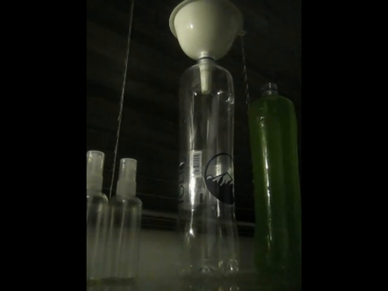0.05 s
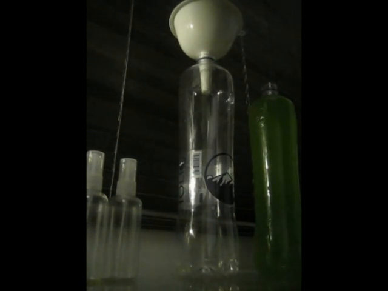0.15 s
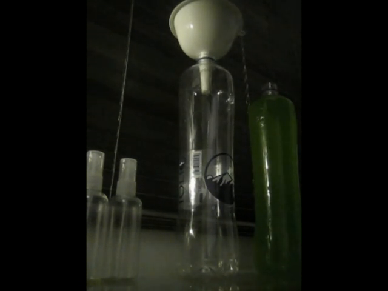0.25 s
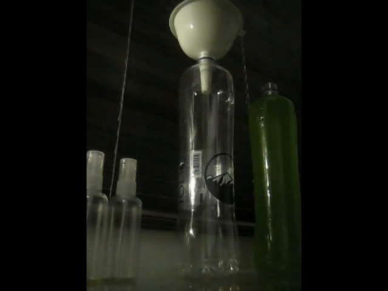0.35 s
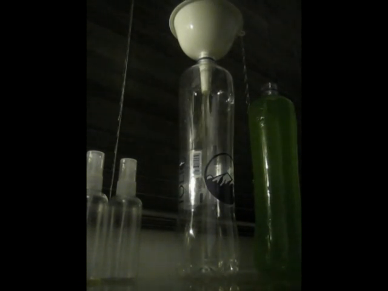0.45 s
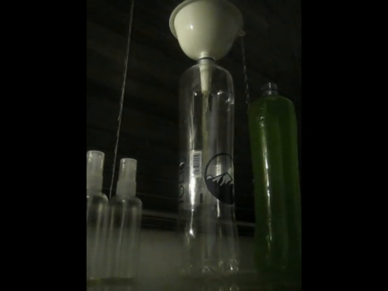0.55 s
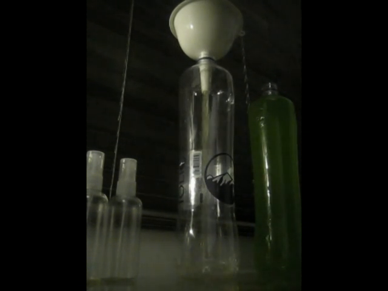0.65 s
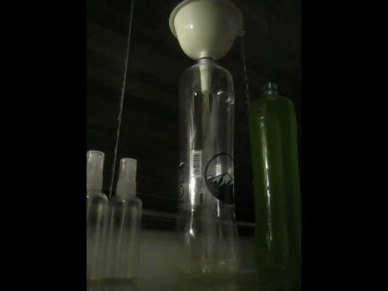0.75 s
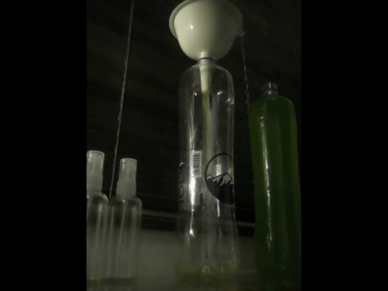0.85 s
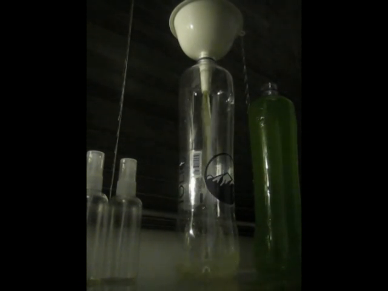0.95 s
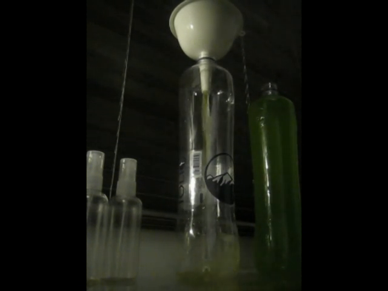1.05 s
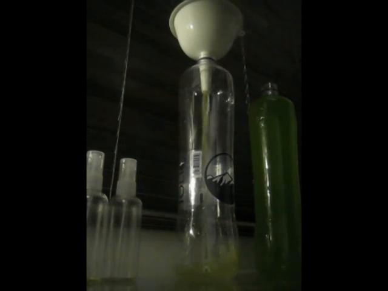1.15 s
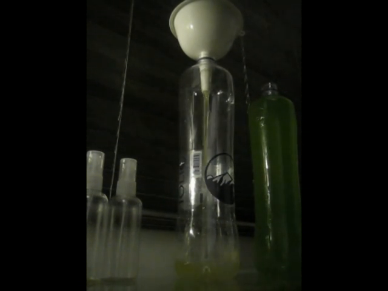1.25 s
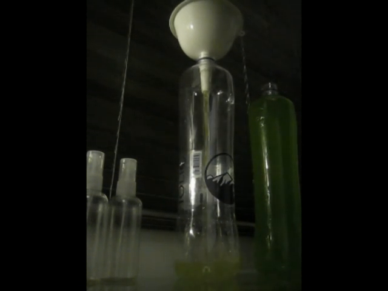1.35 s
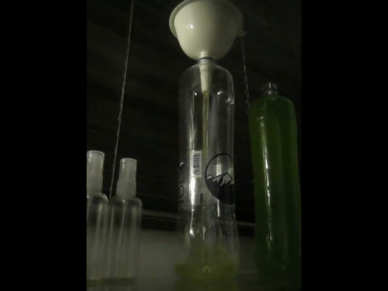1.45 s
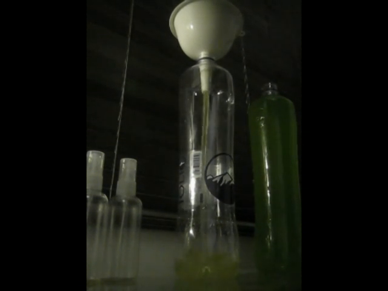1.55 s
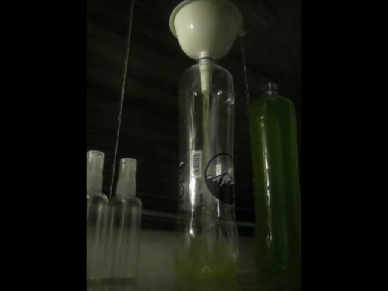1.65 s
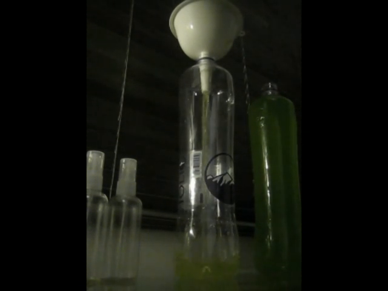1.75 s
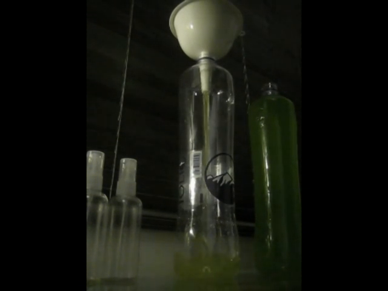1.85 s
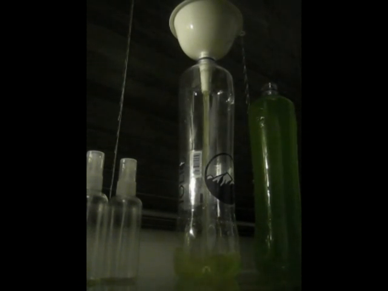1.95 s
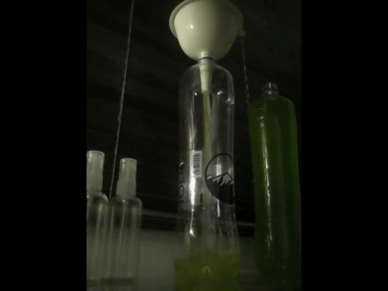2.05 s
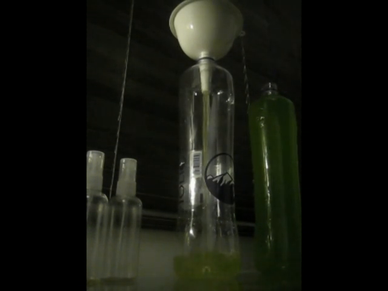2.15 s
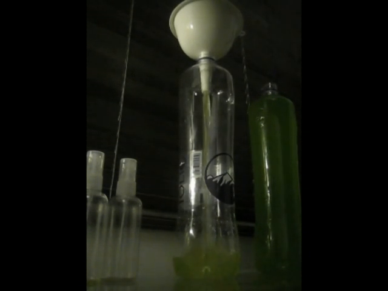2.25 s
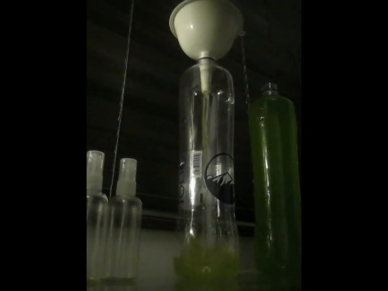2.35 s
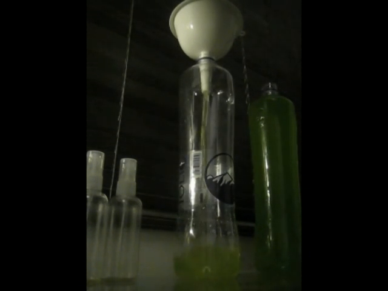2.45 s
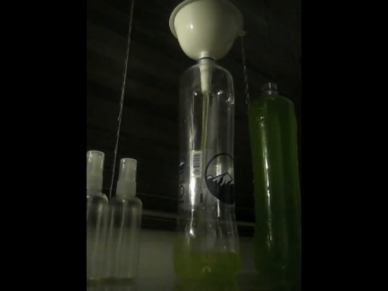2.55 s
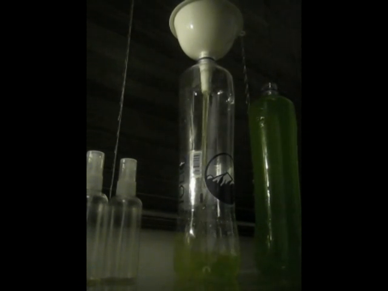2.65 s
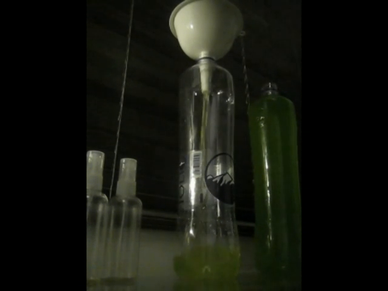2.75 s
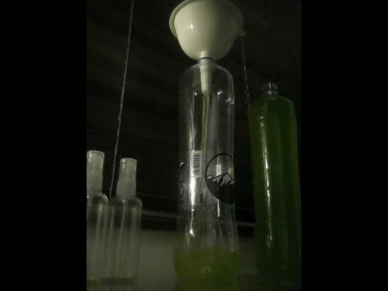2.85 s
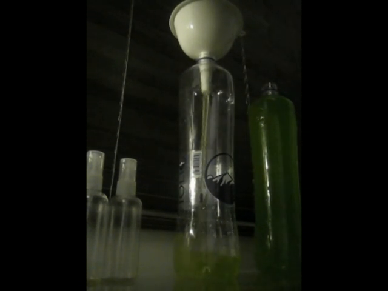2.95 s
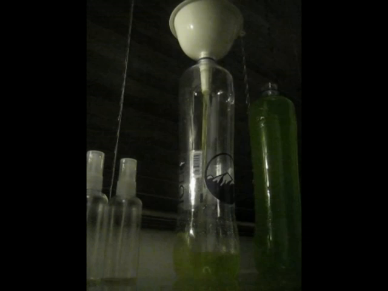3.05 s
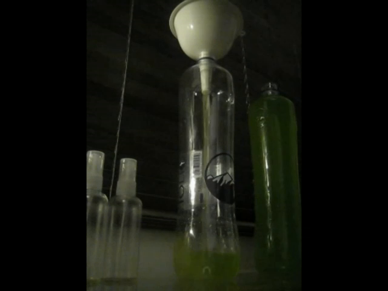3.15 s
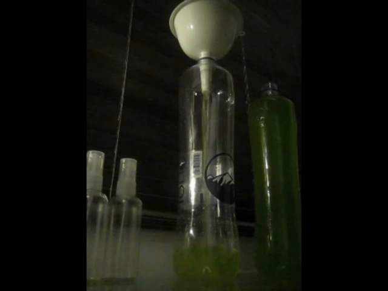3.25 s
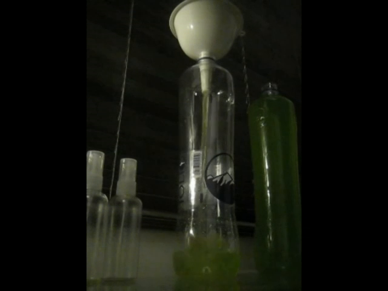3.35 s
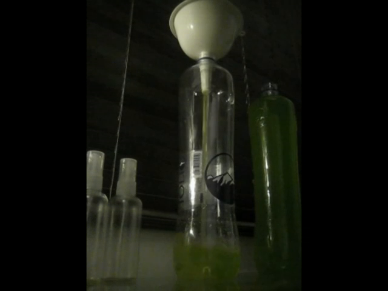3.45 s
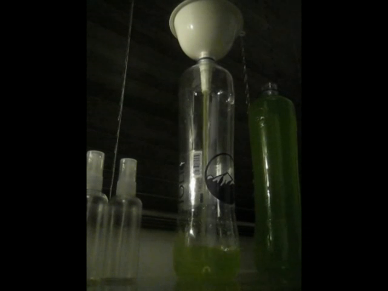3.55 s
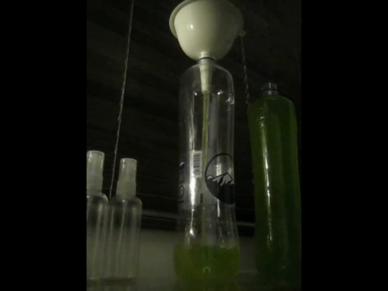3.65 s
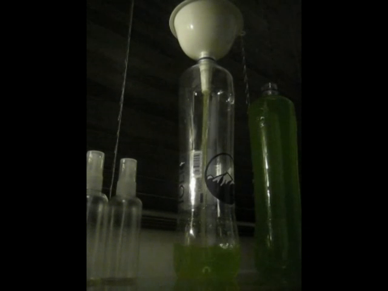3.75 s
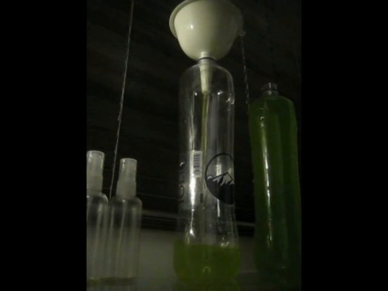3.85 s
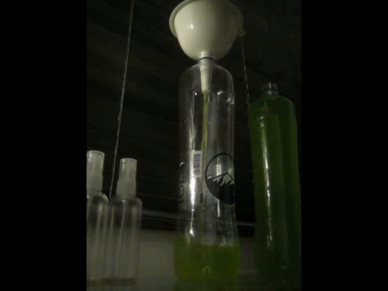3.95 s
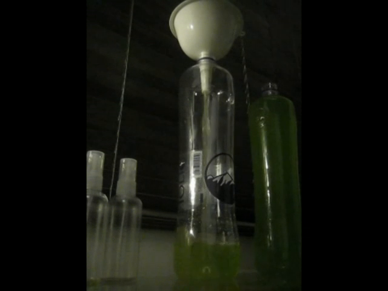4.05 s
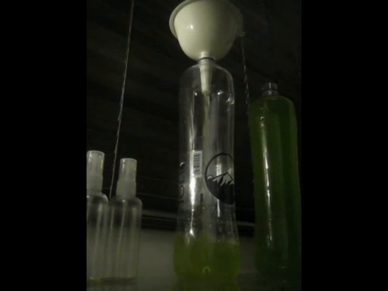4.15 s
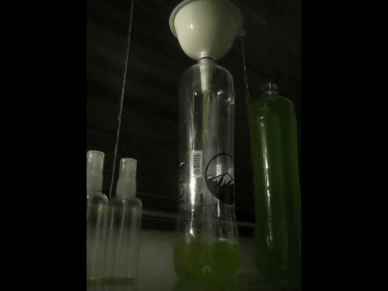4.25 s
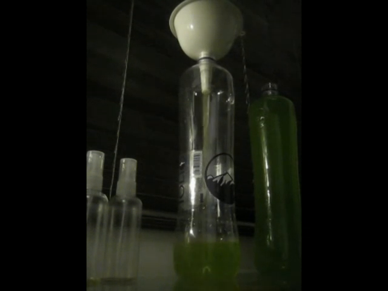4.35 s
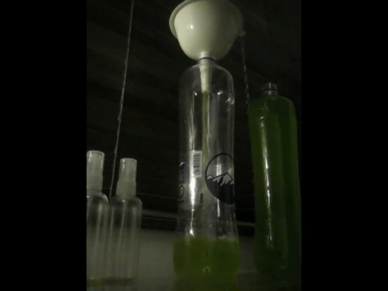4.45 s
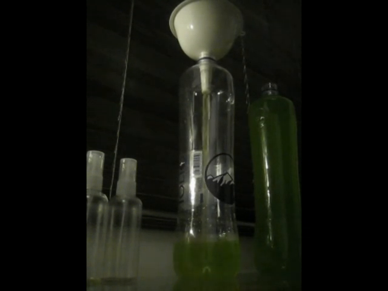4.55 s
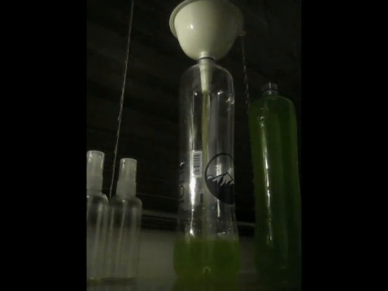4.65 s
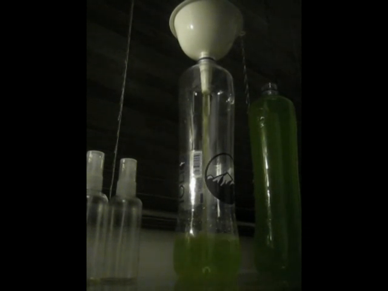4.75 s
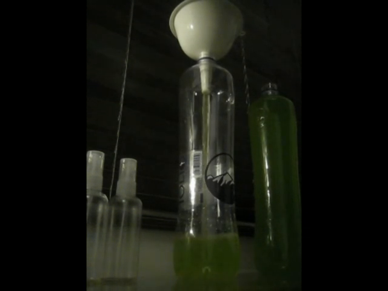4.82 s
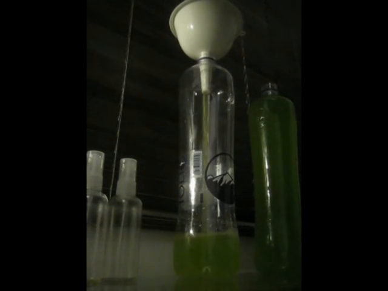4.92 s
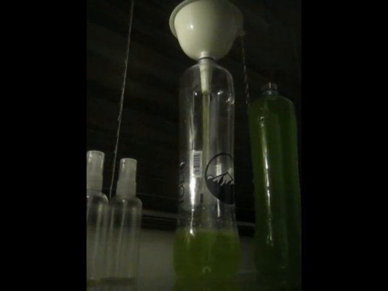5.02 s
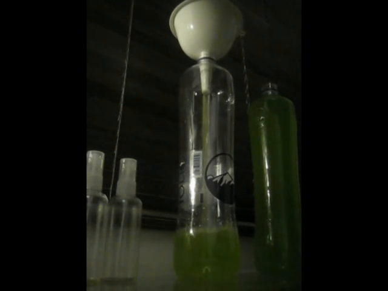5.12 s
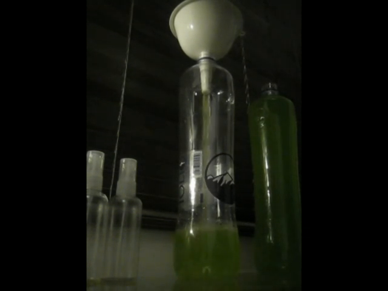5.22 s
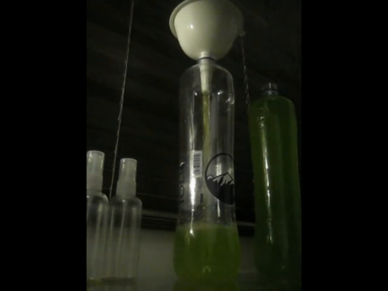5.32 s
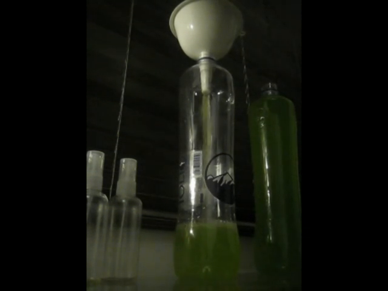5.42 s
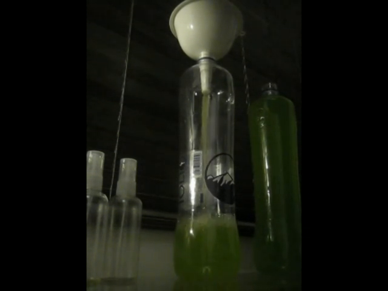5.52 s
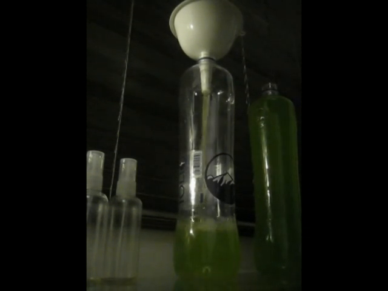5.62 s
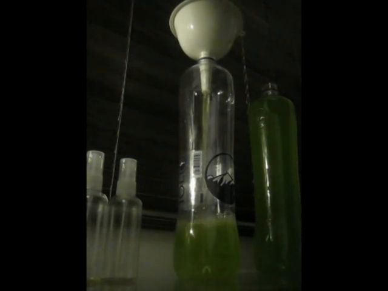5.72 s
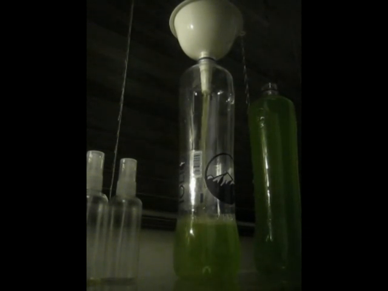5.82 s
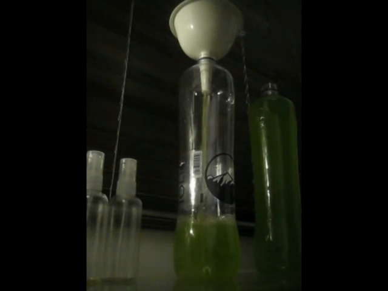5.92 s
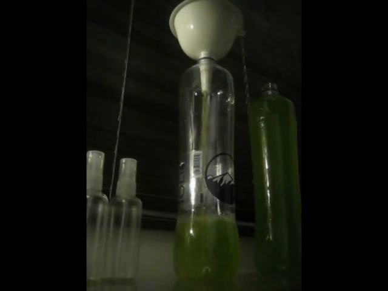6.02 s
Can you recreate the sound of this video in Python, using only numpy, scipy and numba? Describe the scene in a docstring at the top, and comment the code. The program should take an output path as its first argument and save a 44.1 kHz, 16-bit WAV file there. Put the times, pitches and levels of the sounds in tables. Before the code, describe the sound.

Close up in a small room, quiet hiss and a faint high whine come first. A couple of tiny drips precede a sudden splash as liquid from a funnel hits the bottom of a tall empty plastic bottle. The uneven stream spatters brightly and hollowly, then turns into dense bubbling and plopping with deeper gurgles as the level rises, still pouring at the end.

```python
"""On a table in a room, liquid falls from a funnel into a tall plastic bottle, heard from close by.
A broken stream splashes on the bottom, then into the pool: bubbles of all sizes ring a few cycles in
surges, and landing slugs of liquid add slaps and clearer bubbles. Resonances ring along as the bottle,
the table adds a short inverted echo and the walls a soft tail; behind it lie room noise and a thin whine."""
import sys
import numpy as np
from scipy import signal
from scipy.fft import rfft, irfft
from scipy.io import wavfile
from numba import njit

SR = 44100
rng = np.random.default_rng(int(sys.argv[2]) if len(sys.argv) > 2 else 0)


def waveform_to_disk(signal):
    """Save audio, clipped to [-1, 1], as 16-bit WAV at the path in sys.argv[1]."""
    frames = np.transpose(np.atleast_2d(signal))
    scaled = np.clip(frames, -1, 1) * 32767
    samples = np.round(scaled).astype(np.int16)
    wavfile.write(sys.argv[1], SR, samples)


N = 268128  # length in samples

# Room noise, relative level by pitch: f/Hz, level per Hz/dB
ROOM_SPECTRUM = [(25, -13), (60, -16.5), (150, -9.5), (250, -11.5), (370, -8.5), (900, -3), (1300, -6.5),
                 (2100, -16), (3400, -11), (4500, -17.5), (5600, -5.5), (6400, -20.5), (7600, -12.5),
                 (8600, -21), (9700, -16), (11200, -15), (12400, -21), (13200, -31)]
ROOM_DB = -49.5  # rms
# Faint steady tones: f/Hz, rms level/dB
FAINT_TONES = [(371.4, -65), (7881, -73), (11186, -76)]
# The whine wavers in loudness (share) and phase (radians)
WHINE_HZ, WHINE_DB, WARBLE_HZ, WARBLE_RAD, WARBLE_DEPTH = 7560, -53.5, 30, .68, .22

# Loudest slugs that land, levels before the trims in slugs():
# t/s, slap level/dB, big bubble f/Hz, big bubble level/dB, small bubble f/Hz, small bubble level/dB
LOUD_SLUGS = [(0.686, -30, 676, -52, 7570, -44), (0.83, -27, 748, -46, 6720, -17.5),
              (0.972, -23, 689, -32, 3180, -37), (0.978, -17, 690, -24.5, 3080, -29),
              (0.99, 4, 1080, -13, 2590, -9), (1.044, -19, 580, -21, 2690, -31),
              (1.055, -9, 610, -20, 2840, -31), (1.09, -11, 804, -22, 2640, -19.5),
              (1.118, 1.5, 790, -26, 5000, -5.5), (1.14, -9, 850, -24, 7000, -10),
              (1.172, -1.5, 590, -15, 2920, -19), (1.203, -12, 589, -17, 3000, -7),
              (1.233, -1.5, 1280, -22, 3700, -5), (1.252, -9, 770, -25, 2550, -15),
              (1.268, -5.5, 800, -20, 2385, -9), (1.286, -9, 890, -14.5, 3150, -24),
              (1.327, -23, 730, -19.5, 2940, -23), (1.344, -8, 1000, -13, 2660, -16),
              (1.361, -2, 1880, -20, 3010, -12), (1.397, -6, 1550, -24, 2460, -14),
              (1.419, 0, 1040, -23, 7600, -12.5), (1.449, -4, 1020, -19, 2980, -10),
              (1.512, -18, 1010, -25, 4830, -27), (1.542, -1.5, 1780, -15, 4840, -15),
              (1.571, -4, 1030, -7.5, 2800, -18), (1.635, -3, 877, -13, 5100, -31),
              (1.666, -7, 1020, -20, 4940, -29), (1.701, -5, 1540, -10, 3160, -13.5),
              (1.772, -5, 845, -18, 4860, -5), (1.788, -25, 1060, -10.5, 2740, -19),
              (1.828, -2, 1090, -26, 3090, -14.5), (1.89, -0.5, 1380, -17, 3300, -11),
              (1.898, -8, 840, -19, 5500, -10), (1.924, -9, 780, -25, 3000, -22),
              (1.995, -8, 1680, -19, 3280, -22.5), (2.011, -5, 875, -8.5, 2680, -17),
              (2.042, -2, 850, -26, 3930, -14), (2.202, -7, 991, -12, 3310, -17),
              (2.255, -5, 1050, -17.5, 3140, -23), (2.305, -8, 890, -16, 3060, -21),
              (2.331, -6, 800, -29, 3220, -18), (2.392, -6.5, 1040, -17, 3390, -18),
              (2.462, -5, 1150, -15, 3160, -17), (2.484, -4, 1370, -11, 3210, -8),
              (2.521, 1, 1060, -24, 3230, -17), (2.549, -6, 824, -17, 3780, -22),
              (2.572, -13, 1040, -15, 3380, -22), (2.626, -4, 1580, -17, 4950, -14.5),
              (2.652, -8, 1640, -11, 3130, -9), (2.683, -3, 1210, -9, 3220, -14),
              (2.713, -7, 756, -13.5, 3160, -19), (2.756, -7.5, 860, -16, 3290, -30),
              (2.802, -19, 1530, -12, 3060, -29), (2.816, -17, 1480, -3.5, 2670, -30),
              (2.926, -8, 755, -28, 3030, -18), (2.97, -3, 1200, -16, 5450, -23),
              (3.03, -11, 988, -21, 2840, -24), (3.04, -20, 1550, -13, 3030, -29),
              (3.107, -27, 1570, -14, 2930, -27), (3.127, -9, 1150, -21, 3960, -9.5),
              (3.146, -17, 1160, -23, 4030, -15), (3.176, -12, 1060, -16, 5010, -21),
              (3.186, -12, 790, -13, 4950, -24), (3.26, -7, 1570, -15, 4970, -30),
              (3.274, 1, 1100, -22, 4960, -25), (3.293, -5.5, 1070, -12.5, 3300, -27),
              (3.356, -10, 1220, -12, 3370, -28), (3.381, -19, 1530, -12, 3340, -31),
              (3.454, -13, 1110, -16, 7420, -15), (3.498, -6, 1590, -8, 3030, -18),
              (3.537, -7, 1030, -19, 2820, -19), (3.574, -23, 1020, -15, 3600, -22),
              (3.625, -3, 1520, -17.5, 3760, -20), (3.639, -10, 1140, -12, 2500, -15),
              (3.66, -22, 780, -17.5, 3020, -23), (3.759, -26, 916, -12, 3380, -33),
              (3.8, -18, 1000, -13.5, 5000, -29), (3.917, -18, 1110, -13.5, 2900, -30),
              (3.975, -18, 985, -18, 2930, -29), (4.0, -23, 1550, -23, 4650, -17),
              (4.166, -7, 980, -9, 6760, -33), (4.199, -7, 1160, -11, 3100, -18),
              (4.283, -5, 1010, -32, 3100, -17), (4.308, -18, 727, -21, 4220, -15.5),
              (4.337, -20, 1010, -21, 3620, -30), (4.369, -14, 1010, -20, 4770, -21),
              (4.389, -5, 1040, -11.5, 4800, -25), (4.431, -5, 1030, -13.5, 7000, -25.5),
              (4.474, -9, 1120, -10, 2800, -31), (4.55, -22, 1010, -17, 3130, -14),
              (4.581, -4, 1160, -12, 5130, -32), (4.614, -10, 1010, -21, 5350, -13.5),
              (4.644, -17, 1180, -10, 2440, -23), (4.728, -17, 786, -14.5, 3390, -28),
              (4.766, 1.5, 900, -15, 6740, -21), (4.786, -3, 886, -8.5, 3250, -22),
              (4.827, -8, 1030, -15, 3490, -23), (4.864, -16, 1000, -24, 5500, -21),
              (4.964, -24, 985, -7, 3000, -27), (5.037, -29, 970, -22, 2970, -33),
              (5.081, -24, 970, -17, 3020, -27), (5.103, -5.5, 1080, -8.5, 3100, -25),
              (5.14, -10, 790, -14.5, 4460, -29), (5.168, -15, 1110, -16, 4700, -28),
              (5.22, -4, 1000, -16, 3630, -26), (5.286, -16, 715, -23, 7300, -29),
              (5.37, -22, 727, -19, 3000, -39), (5.41, -8, 1040, -15.5, 3000, -42),
              (5.471, -3, 990, -15, 4400, -12.5), (5.535, -13, 1220, -26, 2450, -19),
              (5.594, -17, 1020, -38, 3000, -23), (5.625, -5, 1320, -18, 3000, -18),
              (5.695, -10, 1160, -15, 5200, -24), (5.738, -7, 1010, -30, 3370, -19),
              (5.814, -8, 1220, -19, 3680, -20), (5.866, -15, 980, -14, 4340, -23),
              (5.895, -16, 1220, -22, 5400, -32), (6.028, -30, 1250, -14, 7560, -40)]
# Slap noise, relative level by pitch: f/Hz, level per Hz/dB
SLAP_SPECTRUM = [(300, -12.5), (1000, 2.5), (2500, 0), (5000, 0), (8000, -9.5), (13500, -25)]
FIZZ_HZ, FIZZ_SCATTER_DB = 6800, 5.5  # the finest droplets of a slap differ from slug to slug

# Resonances of the bottle: f/Hz, width/Hz, added level when empty/dB, added level at the last fill/dB
BOTTLE_RESONANCES = [(85, 13, -3, -3), (133, 30.5, 3.5, 15), (270, 31, -7, 3.5), (407, 27, 12, -19),
                     (510, 49, 0, -10), (786.5, 95, -3, -1), (1030, 86, -3, -13), (1192, 45, -41, 4),
                     (1610, 224, 4, -1.5), (4930, 460, -14, -4), (7230, 1560, -11.5, 9)]

# Strength of the stream: t/s, splash level/dB
STREAM_LEVEL = [(1.0, -29.5), (1.2, -25.5), (1.37, -25), (1.6, -24.5), (1.95, -26.5), (2.3, -24.5),
                (2.55, -20.5), (2.8, -24), (3.0, -24), (3.45, -24), (3.75, -25.5), (4.05, -24.5),
                (4.3, -28), (4.55, -24.5), (4.9, -26), (5.1, -23), (5.45, -25), (5.75, -26), (6.08, -27.5)]
# The stream breaks off for a moment: t/s, length/s, level change/dB
STREAM_BREAKS = [(1.132, .04, -14), (1.257, 0.047, -8), (1.323, 0.035, -18), (1.756, 0.02, -10),
                 (1.874, 0.014, -9), (2.373, 0.023, -9), (2.894, 0.045, -3.5), (3.598, 0.017, -8),
                 (4.364, 0.024, -10.5), (5.188, 0.015, -4.5), (5.479, 0.024, -8), (5.853, 0.05, -6.5),
                 (5.914, 0.015, -5.5)]
# Bubble strength by pitch, relative: f/Hz, level per Hz/dB
BUBBLE_SPECTRUM = [(60, -15), (130, -39.5), (300, -2), (600, 0), (1000, 9.5), (1600, -0.5), (2400, -6.5),
                   (3500, -3), (5000, -10.5), (7000, -17.5), (10000, -20), (14000, -35)]
# Air is dragged under and large bubbles swell: t/s, level added to the large bubbles/dB
AIR_GLUGS = [(1.05, -3), (1.19, 3.5), (1.35, 10), (1.44, 7.5), (2.03, -5), (2.62, 4.5), (3.18, 1), (3.3, 9),
             (3.55, 3), (3.75, 1), (4.2, 10.5), (4.41, 9.5), (4.8, 14.5), (5.43, 9.5), (5.7, 3), (6.04, 3)]
GLUG_S = 0.046  # width of each swelling
POUR_S = 0.99  # the stream reaches the bottom
# How the deepening pool shifts the sizes, dB above the splash: (empty, at the last fill)
SPRAY_DB, HOLLOW_DB, GURGLE_DB = (5, -3.5), (-1, 0.5), (4, 19.5)
BARE_DB, COVERED_S = 7.5, 0.53  # the bare bottom drums louder until the pool covers it

# Lesser slugs: dB above the splash for slap, big and small bubble; then the scatter
LESSER_DB, LESSER_SCATTER_DB = (9.5, 3.5, -2.5), 3
# Typical pitch, and its random spread as a natural logarithm
BIG_HZ, BIG_SPREAD, SMALL_HZ, SMALL_SPREAD = 1000, 0.193, 2776, .3
LESSER_FROM_S = 1.35  # lesser slugs land only from here on

TOP_HZ, CEILING = 13750, .85  # treble limit, and the height at which peaks flatten


def undb(db):
    """Turn dB into a plain factor."""
    return 10 ** (np.asarray(db) / 20)


def level(x, db):
    """Scale a sound to an rms level in dB."""
    return x * undb(db) / np.sqrt(np.mean(x ** 2))


def column(table, k):
    """One column of a table."""
    return np.array(table, float)[:, k]


def lookup(table, hz):
    """Read dB from a (Hz, dB) table, with pitch on a log axis."""
    return np.interp(np.log(hz), np.log(column(table, 0)), column(table, 1))


def coloured(table):
    """Noise with the spectrum of a (Hz, dB) table, rms 1."""
    f = np.arange(N // 2 + 1) * SR / N + 1
    return level(irfft(rfft(rng.standard_normal(N)) * undb(lookup(table, f)), N), 0)


def highpass(x, order, hz):
    """Remove sound below a pitch."""
    return signal.sosfilt(signal.butter(order, hz, "high", fs=SR, output="sos"), x)


def fade(x, seconds):
    """Each sample leaves a tail that falls to 1 / e in the given time."""
    return signal.lfilter([1], [1, -np.exp(-1 / (seconds * SR))], x)


def bumps(t, at, width_s, db):
    """Sum of bell-shaped changes of level, in dB."""
    return sum(d * np.exp(-(2 * (t - a) / w) ** 2) for a, w, d in np.broadcast(at, width_s, db))


def filling(t, ends):
    """A value that drifts from its empty to its last state as the pool deepens."""
    return np.interp(t, [POUR_S, N / SR], ends)


def splash_db(t):
    """Level of the stream, with its short breaks."""
    steady_db = np.interp(t, column(STREAM_LEVEL, 0), column(STREAM_LEVEL, 1))
    return steady_db + bumps(t, *np.array(STREAM_BREAKS).T)


def background():
    """Steady room noise, faint tones and a high whine that warbles quickly in loudness and phase."""
    t = np.arange(N) / SR
    tones = sum(undb(db) * np.sin(2 * np.pi * (hz * t + rng.random())) for hz, db in FAINT_TONES)
    turn = 2 * np.pi * WARBLE_HZ * t
    whine = np.sin(2 * np.pi * WHINE_HZ * t + WARBLE_RAD * np.sin(turn))
    whine = whine * (1 + WARBLE_DEPTH * np.cos(turn))
    # a sine of height sqrt(2) has rms 1
    return undb(ROOM_DB) * coloured(ROOM_SPECTRUM) + np.sqrt(2) * (tones + undb(WHINE_DB) * whine)


@njit
def ring(n, start, hz, cycles, size, glide, swell):
    """Each bubble is a dying sine that rises in pitch: air trapped in liquid pulses like a spring.

    cycles = periods to fall to 1 / e, glide = share the pitch rises meanwhile, swell = periods to build up.
    """
    y = np.zeros(n)
    for k in range(len(start)):
        w = 2 * np.pi * hz[k] / SR
        fall = hz[k] / (cycles[k] * SR)
        z = size[k] + 0j
        step = np.exp(1j * w - fall)
        bend = np.exp(1j * w * glide[k] * fall)
        shut, opening = 1., np.exp(-hz[k] / (swell[k] * SR))
        for i in range(start[k], min(n, start[k] + int(5 / fall))):
            y[i] += z.imag * (1 - shut)
            shut *= opening
            z *= step
            step *= bend
    return y


def resonance(x, hz, width_hz):
    """Something that rings at one pitch: a band-pass with gain 1 at the centre."""
    return signal.lfilter(*signal.iirpeak(hz, hz / width_hz, SR), x)


def droplet_burst(blows):
    """A burst of droplets swells within about a millisecond, dies in a few, then patters on."""
    return np.maximum(fade(blows, 0.0031) + 0.15 * fade(blows, 0.019) - 2.0 * fade(blows, 0.00039), 0)


def slap(blows):
    """A slug throws up droplets, heard as noise bursts, and its front cracks in a single swing."""
    drops = coloured(SLAP_SPECTRUM)
    coarse = signal.sosfiltfilt(signal.butter(2, FIZZ_HZ, fs=SR, output="sos"), drops)
    fine_blows = blows * undb(FIZZ_SCATTER_DB * rng.standard_normal(N))
    spatter = droplet_burst(blows) * coarse + droplet_burst(fine_blows) * (drops - coarse)
    crack = resonance(blows, 5500, 8100) * undb(8.5)
    return spatter + crack


def slugs():
    """A landing slug slaps the surface and sets a big and a small bubble ringing, with close neighbours."""
    # three rows per slug: itself, then two neighbours a few milliseconds later
    rows = np.repeat(np.vstack([LOUD_SLUGS, lesser_slugs()]), 3, axis=0)
    s, peak_db, big_hz, big_db, small_hz, small_db = rows.T
    chance = rng.standard_normal((len(s), 3)).T
    later = np.arange(len(s)) % 3 > 0
    start = ((s + later * .0028 * np.abs(chance[0])) * SR).astype(np.int64)
    one = np.ones(len(s))
    pool = np.clip((s - 1.3) / 3.6, 0, 1)  # the deeper the pool, the softer the landing

    big_hz = big_hz * (1 + later * 0.14 * chance[1])
    big_size = undb(big_db - 2.0 - later * 5.8)
    big = ring(N, start, big_hz, 2.67 + 0.52 * pool, big_size, 0.044 * one, 0.11 + 0.32 * pool)

    small_hz = small_hz * (1 + later * 0.046 * chance[2])
    small_size = undb(small_db - 4.0 - later * 3.4)
    small = ring(N, start, small_hz, 6.9 + 2.8 * pool, small_size, 0.026 * one, .5 + 1.0 * pool)

    blows = np.zeros(N)
    np.add.at(blows, start[~later], undb(peak_db - 14.5 - 7.7 * pool)[~later])
    return highpass(big + small + slap(blows), 2, 320)


def bottle(pour):
    """The bottle rings along at its own pitches, whose strengths drift from empty to the last fill."""
    ringing = sum(undb(np.linspace(empty_db, full_db, N)) * resonance(pour, hz, width_hz)
                  for hz, width_hz, empty_db, full_db in BOTTLE_RESONANCES)
    # a small vessel radiates no deep bass
    return highpass(pour + ringing, 4, 72)


def table_echo(x, ms, share):
    """An inverted copy a fraction of a millisecond late: peaks at odd multiples of 1 / (2 delay)."""
    f = np.arange(N // 2 + 1) * SR / N
    return irfft(rfft(x) * (1 - share * np.exp(-2j * np.pi * f * ms / 1000)), N)


def walls(x, t60_s, wet_db, gap_s):
    """A diffuse tail after a small gap, falling 60 dB in t60_s.

    It is drawn anew for each stretch of sound, as the splash wanders and the liquid rises.
    """
    t = np.arange(int(.4 * SR)) / SR
    part = 8192  # samples per stretch
    wet = np.zeros(N + SR)
    for i in range(0, N, part):
        tail = rng.standard_normal(len(t)) * np.exp(-np.log(1000) * t / t60_s) * (t > gap_s)
        piece = signal.fftconvolve(x[i:i + part], tail / np.sqrt(np.sum(tail ** 2)))
        wet[i:i + len(piece)] += piece
    return x + undb(wet_db) * wet[:N]


def surges(rate, spread_db, decay_s):
    """The stream breaks into lumps, rate per second: fast rises and quick decays, rms 1."""
    lumps = (rng.random(N) < rate / SR) * undb(spread_db * rng.standard_normal(N))
    return level(fade(lumps, decay_s) - fade(lumps, 0.0011) + 0.62, 0)


def spray(lumps):
    """Droplets too fine to hear singly: high noise that follows the lumps of the stream."""
    t = np.arange(N) / SR
    mist = level(highpass(coloured(BUBBLE_SPECTRUM), 2, 1800), -13.5)
    return mist * lumps ** 1.5 * undb(splash_db(t) + filling(t, SPRAY_DB)) * (t > POUR_S)


def stream():
    """Dense random bubbles over a fine spray; the flow sets how strong those of each size are."""
    count = 40000
    at, pitch, long, bend, big = rng.random((count, 5)).T
    at = POUR_S + at * (N / SR - POUR_S)
    hz = 70 * (14000 / 70) ** pitch ** .7
    start = (at * SR).astype(np.int64)

    # how far each bubble belongs to the high, deep or low group, 0 to 1
    high = np.clip(np.log2(hz / 1700) / 0.52, 0, 1)
    deep = np.clip(np.log2(260 / hz) / 0.43, 0, 1)
    low = np.clip(np.log2(700 / hz) / 0.18, 0, 1) - deep

    glug_db = bumps(at, column(AIR_GLUGS, 0), GLUG_S, column(AIR_GLUGS, 1))
    hollow_db = filling(at, HOLLOW_DB) + BARE_DB * np.exp(-(at - POUR_S) / COVERED_S)
    db = splash_db(at) + high * filling(at, SPRAY_DB)
    db = db + low * (hollow_db + glug_db) + deep * (filling(at, GURGLE_DB) + glug_db)
    cycles = 3.2 + (9.0 + 10.0 * high - 6.6 * deep) * long ** 3

    lumps = surges(45, 0.42, 0.0029)
    # small bubbles feel each lump most
    lump = lumps[start] ** (1.48 + 0.26 * high - 1.7 * deep)
    # droplets of like size come in swarms of their own, one per half octave
    swarms = np.array([surges(55, 2.5, 0.0099) for _ in range(6)])
    band = np.clip(2 * np.log2(hz / 1400), 0, 5).astype(int)
    lump = lump * swarms[band, start] ** (1.44 * high)

    # a few bubbles are much stronger than the rest
    bubble_db = db + lookup(BUBBLE_SPECTRUM, hz) + 14.08 * big ** 3.17 - 13.5
    size = undb(bubble_db) * lump * hz / 1000 / np.sqrt(cycles)
    return ring(N, start, hz, cycles, size, 0.0986 * bend, 0.29 + 0.44 * bend) + spray(lumps)


def lesser_slugs(count=70):
    """Rows like those of the loudest slugs, at random moments and following the strength of the stream."""
    chance = rng.standard_normal((count, 5)).T
    s = LESSER_FROM_S + rng.random(count) * (N / SR - LESSER_FROM_S - .02)
    scatter_db = LESSER_SCATTER_DB * np.tanh(chance[:3])
    slap_db, big_db, small_db = splash_db(s) + np.array(LESSER_DB)[:, None] + scatter_db
    spray_db = filling(s, SPRAY_DB)
    big_hz = BIG_HZ * np.exp(BIG_SPREAD * chance[3])
    small_hz = np.minimum(SMALL_HZ * np.exp(SMALL_SPREAD * chance[4] ** 2), 9000)
    return np.array([s, slap_db + spray_db, big_hz, big_db, small_hz, small_db + spray_db]).T


def scene():
    """The pour passes through bottle, table and walls, then joins the background; both channels match."""
    pour = bottle(slugs() + stream())
    pour = table_echo(pour, ms=0.481, share=0.25)
    pour = walls(pour, t60_s=0.3, wet_db=-11.5, gap_s=0.0032)
    return np.tile(background() + pour, (2, 1))


def record(dry):
    """Round the loudest peaks softly, then cut the top of the treble."""
    rounded = CEILING * np.tanh(dry / CEILING)
    return signal.sosfilt(signal.ellip(8, .2, 70, TOP_HZ, fs=SR, output="sos"), rounded)


dry = scene()
out = record(dry)
waveform_to_disk(out)
```